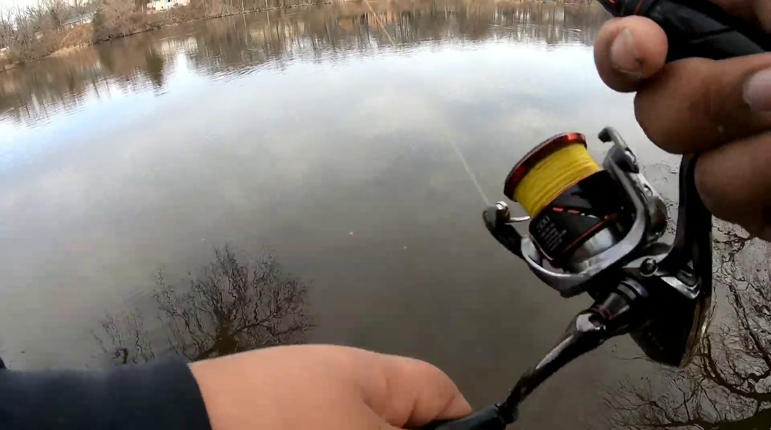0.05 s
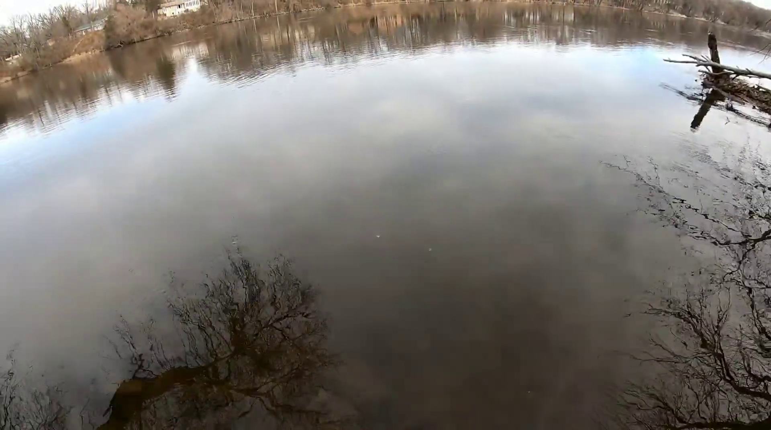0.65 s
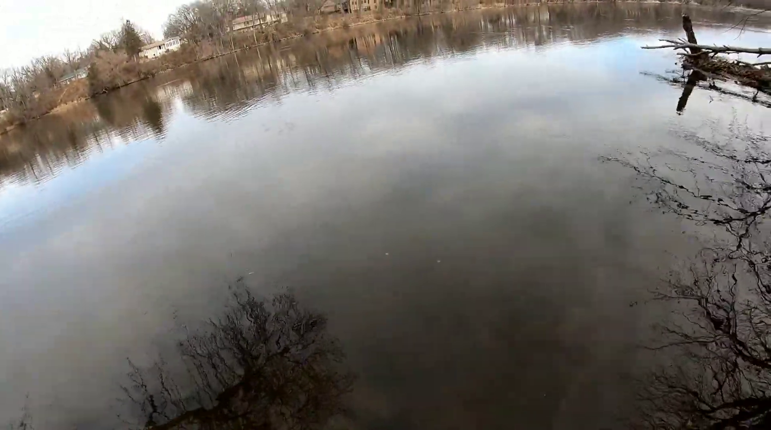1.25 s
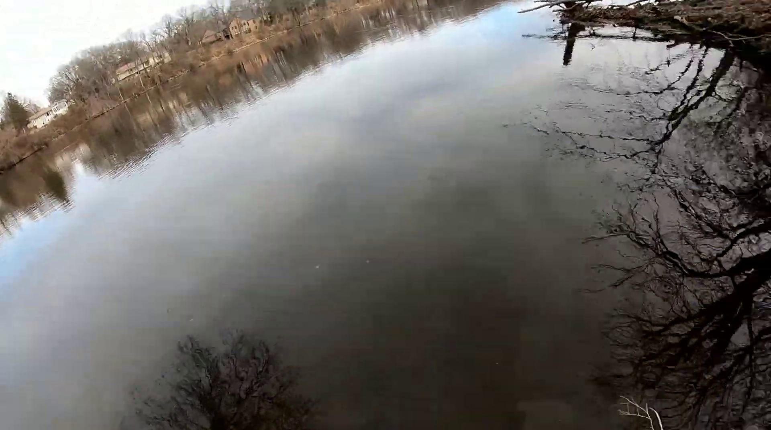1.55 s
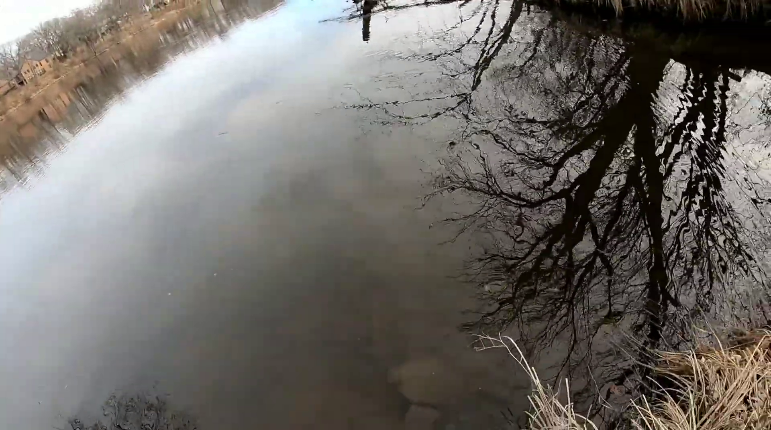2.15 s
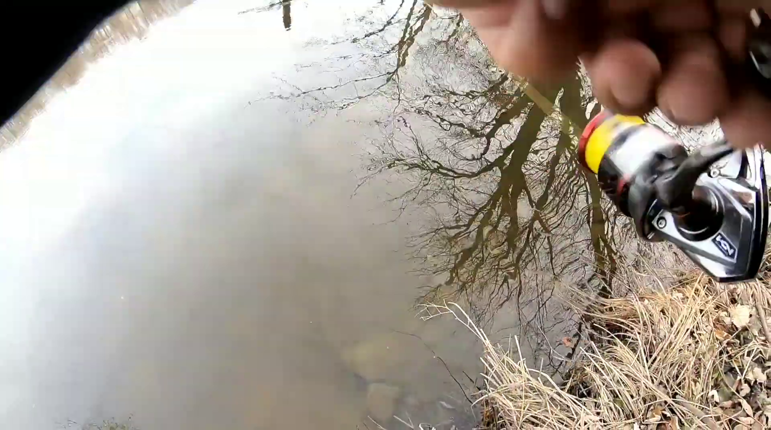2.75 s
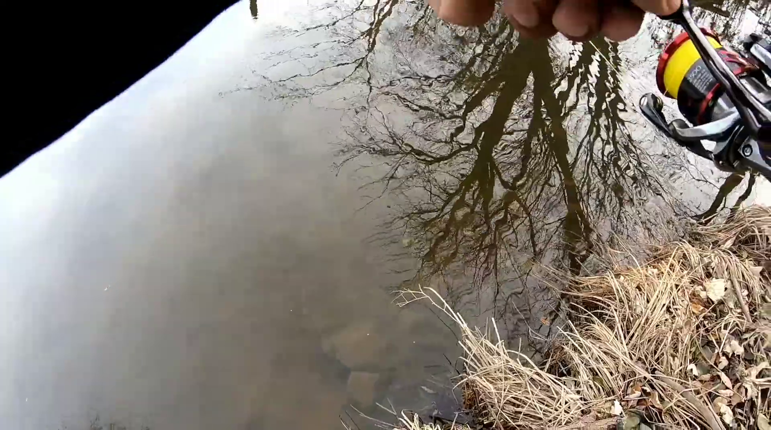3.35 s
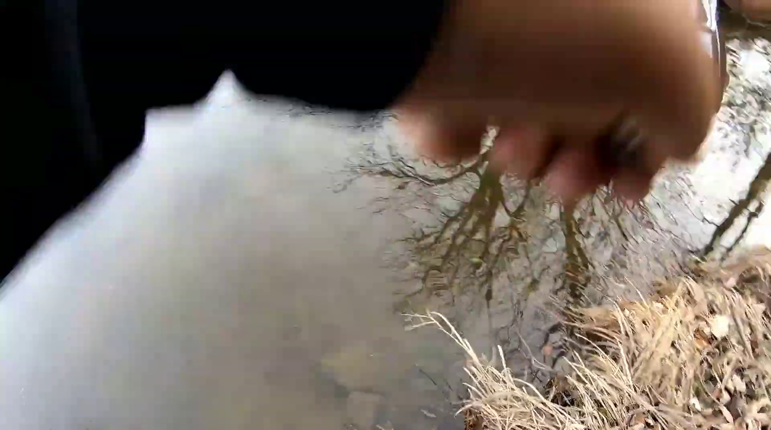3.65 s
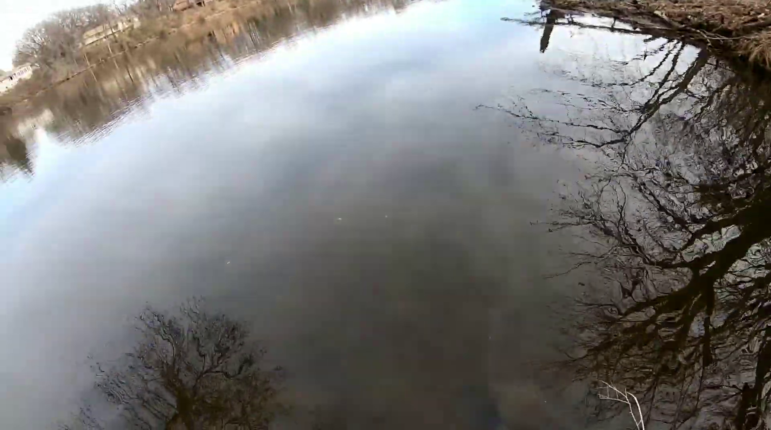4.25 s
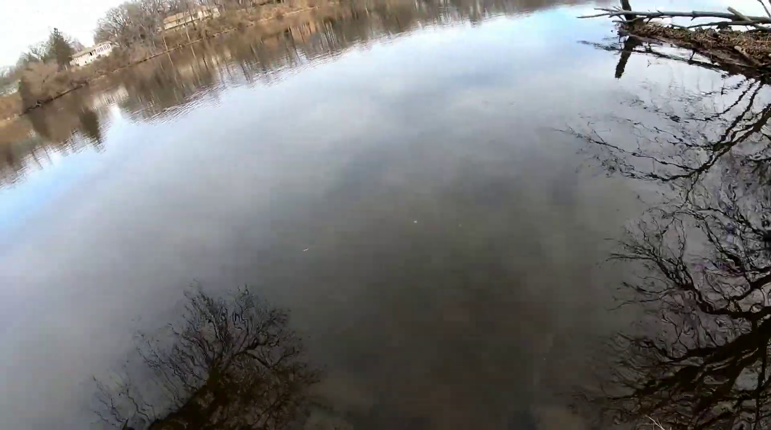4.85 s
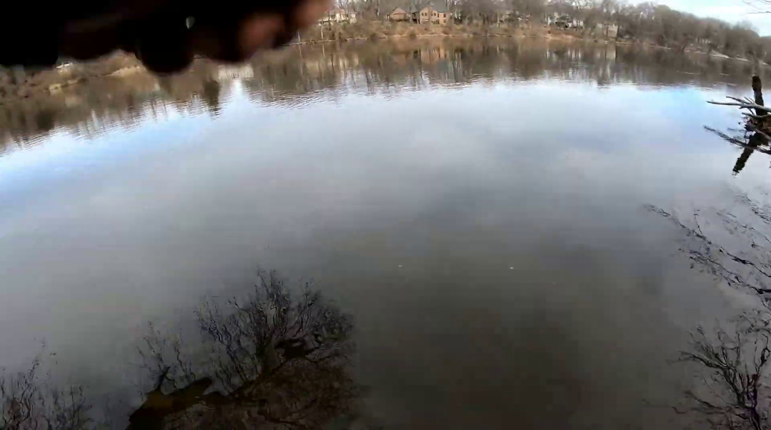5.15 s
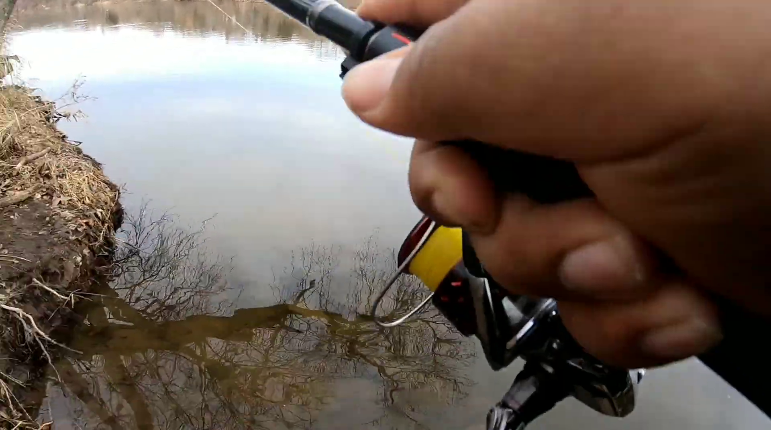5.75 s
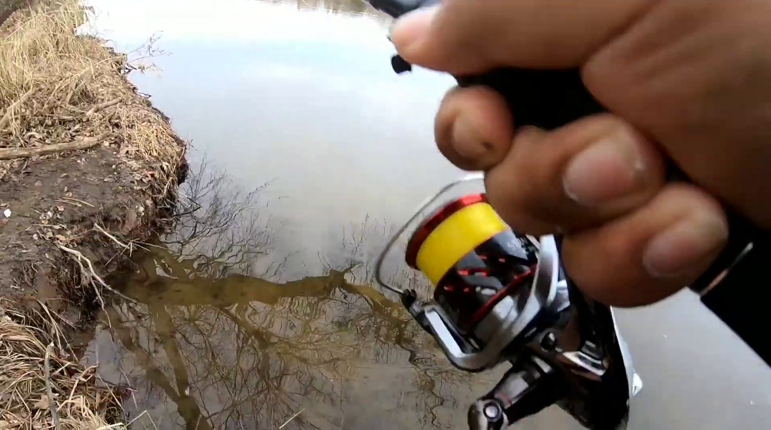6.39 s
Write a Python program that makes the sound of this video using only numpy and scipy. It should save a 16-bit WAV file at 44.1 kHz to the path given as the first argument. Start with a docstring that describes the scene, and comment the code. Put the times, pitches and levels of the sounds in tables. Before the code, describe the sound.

Faint ratchet ticks and a soft bump come first, over a low outdoor wind rumble. Then a fishing reel is wound in five uneven bursts with short pauses, very close to the microphone. The line runs over the rod guides with a bright, gritty hiss and a whistle that rises and falls with the hand, squeaking most in the last burst. Occasional reel clicks, sleeve rustles and dull knocks accompany the winding.

```python
"""On a riverbank, close to a body-worn camera, a spinning reel is cranked in five short spurts.
Braided line runs over the rod guides. Its weave is a periodic excitation, so it whistles at a pitch
that follows the uneven hand; its fibres rasp by friction, and the rod's resonances colour both.
The reel ticks between spurts, arms and sleeves bump and brush the camera, and wind rumbles on the
two microphone ports."""
import sys
import numpy as np
from scipy import signal
from scipy.fft import rfft, irfft
from scipy.io import wavfile
from scipy.ndimage import uniform_filter1d

SR = 44100
rng = np.random.default_rng(int(sys.argv[2]) if len(sys.argv) > 2 else 0)


def bounce(signal):
    """Save signal as a 16-bit WAV file at the path given by the first command-line argument."""
    frames = np.transpose(np.atleast_2d(signal))
    limited = np.clip(frames, -1, 1)
    pcm = np.round(limited * 32767).astype(np.int16)
    wavfile.write(sys.argv[1], SR, pcm)


N = 291942
T = np.arange(N) / SR
BINS = np.fft.rfftfreq(N, 1 / SR) + 1e-3


def undb(db):
    """Decibels to amplitude ratio."""
    return 10 ** (np.asarray(db) / 20)

def unit(x):
    """Normalisation to rms 1."""
    return x / np.sqrt(np.mean(x ** 2))

def steady(x):
    """Division by the short-term rms holds the level; quick flutter remains."""
    return x / np.sqrt(uniform_filter1d(np.mean(np.square(x), axis=0), SR // 30) + 1e-12)

def curves(rows):
    """Linear interpolation of each column over time."""
    s, *columns = np.transpose(rows)
    return [np.interp(T, s, c) for c in columns]

def across(points):
    """Interpolation of a table over log frequency."""
    hz, value = np.transpose(points)
    return np.interp(np.log(BINS), np.log(hz), value)

def shape(x, response):
    """Filtering by multiplication of spectra."""
    return irfft(rfft(x) * response, N)

def walk(rate_hz):
    """Smooth random modulation of rms 1."""
    k = max(int(SR / rate_hz), 2)
    return unit(uniform_filter1d(np.repeat(rng.standard_normal(N // k + 1), k)[:N], k))

def pan(db):
    """Two gains for a left-minus-right level difference."""
    return undb(np.array([[db], [-db]]) / 2)

def pair(apart):
    """Partly coherent noise at the two ports; apart weights the unshared part."""
    return unit(rng.standard_normal(N) + apart * rng.standard_normal((2, N)))

def noise_band(rows, width_hz):
    """Quadrature modulation: a noise band follows a path of pitch and level."""
    hz, db = curves(rows)
    phase = 2 * np.pi * np.cumsum(hz) / SR
    a, b = shape(rng.standard_normal((2, N)), 1 / (1 + (2 * BINS / width_hz) ** 4))
    band = unit(a * np.sin(phase) + b * np.cos(phase))
    return band * undb(db) * (T >= rows[0][0]) * (T < rows[-1][0])


# wind spectrum: frequency_hz, gain_db
WIND_SPECTRUM = [(20, -7), (70, 1), (160, -7.5), (430, -26), (780, -27), (1300, -44), (7000, -54),
                 (9000, -62), (15000, -80)]
# strength of the breeze: time_s, level_db
BREEZE = [(.3, -43), (.8, -47.5), (1.4, -37.5), (2.3, -43.5), (4.3, -43.5), (5.2, -39.5)]
def wind(air_db=-43.5, buffet_db=2.5):
    """Turbulent pressure on the ports: a rumble follows the breeze under a faint, even hiss."""
    air = unit(shape(pair(apart=0.47), undb(across(WIND_SPECTRUM))))
    rumble = shape(air, 1 / (1 + (BINS / 300) ** 4))
    gusts = undb(curves(BREEZE)[0] + buffet_db * walk(22))
    return ((air - rumble) * undb(air_db) + rumble * gusts) * pan(db=-1.5)


# ring of the spool: time_s, pitch_hz, level_db
SPOOL_RING = [(0, 2520, -64), (.26, 2560, -56), (.29, 3320, -60), (.72, 3290, -78)]
def spool():
    """Diffuse resonance: the spool rings faintly as the handle is eased round and let go."""
    return noise_band(SPOOL_RING, width_hz=440)


# finger movements: middle_s, length_s, centre_hz, level_db
RUSTLES = [(0.12, 0.49, 1720, -59.5), (0.273, 0.27, 4800, -59.5), (4.737, 0.098, 5880, -67),
           (5.65, 0.12, 2280, -66.5)]
def fingers(bandwidth=0.38):
    """Sliding friction: fingers shift on the grip in soft swells of broad noise."""
    out = 0
    for middle_s, length_s, hz, db in RUSTLES:
        band = 1 / (1 + ((BINS / hz - hz / BINS) / bandwidth) ** 2)
        swell = np.exp(-(2 * (T - middle_s) / length_s) ** 2)
        out += unit(shape(pair(apart=1.0), band)) * undb(db) * swell
    return out


# spectrum of a click: frequency_hz, gain_db
TICK_SPECTRUM = [(1700, -19), (2550, 5.5), (6800, 6), (9000, -19.5), (15000, -45.5)]
# single clicks of reel and line: start_s, level_db
TICKS = [(0.143, -44.5), (0.21, -41), (0.2245, -38.5), (0.239, -38.5), (0.2493, -36), (0.324, -35),
         (1.025, -32.5), (1.093, -25.5), (1.298, -23), (1.4667, -22.5), (2.1905, -47.5), (2.2588, -36),
         (3.852, -22.5), (5.3811, -30.5), (5.42, -41)]
def ticks(gain_db=-1, decay_s=0.0024, ratchet_s=(.015, .18), ratchet_hz=56, ratchet_db=-49):
    """Impacts of small metal parts: a faint, uneven run of the ratchet, then single catches."""
    teeth = np.arange(*ratchet_s, 1 / ratchet_hz)
    jitter = rng.standard_normal((len(teeth), 2))
    ratchet = [(s + .0015 * late, ratchet_db + 2 * loud) for s, (late, loud) in zip(teeth, jitter)]
    bursts = sum(undb(db) * np.exp(-np.abs(T - s) / decay_s) * (T >= s) for s, db in ratchet + TICKS)
    rounded = uniform_filter1d(bursts, SR // 1000)
    return undb(gain_db) * shape(pair(apart=0.94) * rounded, unit(undb(across(TICK_SPECTRUM))))


# spectrum of rubbing cloth: frequency_hz, gain_db
CLOTH_SPECTRUM = [(50, -7.5), (150, 7.5), (550, -12.5), (7000, -34), (10000, -57.5)]
# brushes of a sleeve: peak_s, level_db, fade_s
BRUSHES = [(.35, -39, 0.34), (1.38, -47, 0.35), (1.7, -42.5, 0.1), (2.38, -41.5, 0.92), (3.499, -47, 1.5),
           (5.258, -41, 0.5), (6.32, -38, 0.23)]
def sleeves(rise_s=0.34):
    """Friction of sleeve on jacket: each brush gains 20 dB in rise_s and loses 20 dB in fade_s."""
    drag = undb(2 * walk(35))
    rub = unit(shape(pair(apart=0.98) * drag, undb(across(CLOTH_SPECTRUM))))
    swells = sum(undb(db - 20 * np.maximum((s - T) / rise_s, (T - s) / fade_s))
                 for s, db, fade_s in BRUSHES)
    return rub * swells * pan(db=-2.0)


# modes of the camera mount: frequency_hz, t60_s, level_db
MOUNT_MODES = [(408, 0.018, 7.5), (308, 0.037, 4.5), (159.6, 0.07, 0), (98.2, 0.069, -6)]
# knocks on the mount: start_s, level_db, left_minus_right_db
BUMPS = [(0.254, -24.5, -14.5), (1.329, -30, -6.5), (1.368, -26.5, -5), (1.574, -33.5, -14.5),
         (2.538, -27.5, 3.5), (3.422, -19.5, -5), (3.693, -34.5, -19.5), (3.979, -26.5, -11),
         (5.251, -29.5, -18), (6.119, -28, -9)]
def bumps(scatter=0.13, gain_db=-1, lag_cycles=0.59, attack_s=0.0027):
    """Damped free vibration: soft knocks ring the mount, whose low modes come late and linger."""
    out = np.zeros((2, N))
    age = np.arange(SR // 5) / SR
    detunings = 1 + scatter * rng.standard_normal((len(BUMPS), len(MOUNT_MODES)))
    for (s, db, pan_db), detuning in zip(BUMPS, detunings):
        ring = 0
        for (hz, t60, mode_db), ratio in zip(MOUNT_MODES, detuning):
            t = np.maximum(age - lag_cycles / hz, 0)
            envelope = undb(mode_db - 60 * t / t60) * (1 - np.exp(-t / attack_s)) ** 2
            ring += envelope * np.sin(2 * np.pi * hz * ratio * t)
        knock = undb(db + gain_db) * pan(pan_db) * ring / np.abs(ring).max()
        start = int(s * SR)
        out[:, start:start + len(age)] += knock[:, :N - start]
    return out


# rate at which the weave passes a guide, one list per spurt: time_s, weave_hz
WEAVE_RATES = [
    [(1.02, 1150), (1.072, 1541), (1.09, 2199), (1.19, 1711), (1.25, 1927), (1.305, 1737), (1.373, 2560),
     (1.44, 1688), (1.505, 1696), (1.573, 1193), (1.62, 1613), (1.711, 783.3), (1.8, 385.1)],
    [(2.26, 419), (2.335, 877), (2.405, 1559), (2.455, 1643), (2.496, 997.7), (2.575, 1525), (2.635, 1160),
     (2.705, 1000), (2.746, 1051), (2.772, 802.3), (2.8, 750), (2.856, 1206), (2.895, 898), (2.925, 809),
     (2.97, 621)],
    [(3.43, 381), (3.525, 1866), (3.56, 1239), (3.605, 973), (3.685, 1772), (3.77, 949), (3.842, 1296),
     (3.868, 1714), (3.92, 1691), (3.955, 1330), (4.04, 1614), (4.15, 1119), (4.23, 1389), (4.263, 1893),
     (4.33, 1087), (4.38, 1044), (4.47, 375.6)],
    [(4.815, 447.4), (4.86, 702), (4.93, 1593), (4.962, 1477), (5.07, 1770), (5.135, 1514), (5.228, 1713),
     (5.256, 1468), (5.284, 1430), (5.318, 957.7), (5.365, 837.5), (5.43, 375.6)],
    [(5.93, 396), (5.985, 754.7), (6.045, 1682), (6.086, 1422), (6.125, 903), (6.165, 873.5), (6.203, 1290),
     (6.248, 1173), (6.285, 1532), (6.318, 876.5), (6.376, 543), (6.411, 331.4)],
]
def weave_rate(inertia_s=0.013):
    """Rotor inertia smooths the surge in line speed from each push on the handle."""
    hz, = curves([point for spurt in WEAVE_RATES for point in spurt])
    return uniform_filter1d(hz, int(inertia_s * SR))


# spurts of cranking: start_s, swell_s, rasp_db, whistle_db, hiss_over_rasp_db, growl_db
SPURTS = [(1.017, 0.058, -36, -3, 1, -46.5), (2.259, 0.07, -34.5, -2.5, 1, -51),
          (3.425, 0.071, -35.5, -1, 0.5, -50), (4.815, 0.043, -35.5, -2.5, 1, -43.5),
          (5.93, 0.06, -34.5, 0, -7.5, -36.5)]
# the hand's halt after each spurt: stop_s
STOPS = [1.762, 2.946, 4.432, 5.39, 6.37]
def spurt_gains(swell_db=27, release_t60_s=0.09):
    """Envelopes of rasp, whistle, hiss and growl: exponential growth, hold and decay."""
    gains = np.zeros((4, N))
    for (start_s, swell_s, rasp_db, whistle_db, hiss_db, growl_db), stop_s in zip(SPURTS, STOPS):
        swell = undb(swell_db * np.minimum((T - start_s) / swell_s - 1, 0))
        release = undb(-60 * np.maximum(T - stop_s, 0) / release_t60_s)
        gains += undb([[rasp_db], [whistle_db], [rasp_db + hiss_db], [growl_db]]) * swell * release
    return gains

def resonances(modes):
    """Superposition of second-order resonators."""
    return sum(undb(db) / (1 + 1j * (BINS / hz - hz / BINS) * hz / width) for hz, width, db in modes)

def ripple(depth_db):
    """Dense small resonances of the guides: a gliding partial flares and dips as it crosses them."""
    return undb(depth_db * np.tanh(walk(80)[:len(BINS)]))

def partial(phase, flutter_db=5):
    """Intermittent contact modulates one partial in amplitude and phase."""
    return unit(undb(flutter_db * np.tanh(walk(150))) * np.sin(phase + .6 * walk(300)))


# modes of rod and spool: frequency_hz, width_hz, gain_db
ROD_MODES = [(1300, 33, -3.5), (1471, 32, -7), (1770, 18, 1), (2081, 25, 5), (2400, 19, 2), (2560, 43, 8),
             (2727, 55, 9), (2987, 44, 5.5), (3130, 31, 6.5), (3463, 29, 1.5)]
# response between the modes: frequency_hz, gain_db
ROD_FLOOR = [(500, -44.5), (1000, -27.5), (2600, 4), (3600, -26.5), (4300, -12.5), (7000, -29.5)]
def rod_response():
    """Modal response: narrow resonances stand on a broad, band-limited floor."""
    band = 1 / np.sqrt((1 + (BINS / 7900) ** 30) * (1 + (750 / BINS) ** 10))
    return (resonances(ROD_MODES) + undb(across(ROD_FLOOR))) * band


# modes of the guides: frequency_hz, width_hz, gain_db
GUIDE_MODES = [(4030, 400, 3), (5120, 75, 3), (5330, 120, -7), (6150, 480, -4)]
def guide_response(spectrum, ripple_db):
    """Resonance of the metal guides colours a treble spectrum."""
    return undb(across(spectrum)) * (1 + resonances(GUIDE_MODES)) * ripple(ripple_db)


# whistle strength before the rod's resonances: pitch_hz, gain_db
WHISTLE_SPECTRUM = [(1200, -38.5), (1900, -35.5), (2550, -38.5), (3400, -38), (5000, -29.5)]
def whistle(phase, rod, twin_gain=0.55, twin_spread_hz=170, fray=0.44):
    """Forced vibration of the rod at the weave's octave; two guides sing apart and beat."""
    drift = 2 * np.pi * np.cumsum(twin_spread_hz * walk(70)) / SR
    tones = partial(2 * phase, flutter_db=3.0) + twin_gain * partial(2 * phase + drift, flutter_db=7.5)
    slipping_fibres = (1 + fray * walk(700)) * undb(5 * np.tanh(walk(220)))
    rough = steady([tones * slipping_fibres])[0]
    return shape(rough, rod * undb(across(WHISTLE_SPECTRUM)) * ripple(depth_db=3))


# strength of the weave's upper harmonics: pitch_hz, gain_db
OVERTONE_SPECTRUM = [(1500, -30), (3100, -16.5), (4400, -22), (6200, -12.5), (7400, -18.5), (9000, -45)]
def overtones(phase, rod, rod_db=-16):
    """Third and fourth harmonics excite the rod when the line is slow, the guides when it is fast."""
    third = .35 * partial(3 * phase + walk(600), flutter_db=9)
    fourth = partial(4 * phase + .8 * walk(600), flutter_db=10)
    return shape(third + fourth, rod * undb(rod_db) + guide_response(OVERTONE_SPECTRUM, ripple_db=6))


# strength of the weave's fundamental: pitch_hz, gain_db
GROWL_SPECTRUM = [(450, -19), (700, -2), (1700, 1.5), (2250, -3), (5000, -53)]
def growl(phase, sliding, friction, rod):
    """Forced vibration of the rod by the weave's fundamental and by friction noise."""
    force = partial(phase, flutter_db=8) * sliding + .7 * friction
    return shape(force, undb(across(GROWL_SPECTRUM)) * (1 + rod) * ripple(depth_db=3))

def grit(per_s=110, scatter_db=4, decay_s=0.0011):
    """Coarse snags arrive as a Poisson process, each a very short burst of noise."""
    snags = (rng.random(N) < per_s / SR) * undb(scatter_db * rng.uniform(-0.46, 1, N))
    return unit(pair(apart=0.83) * signal.lfilter([1], [1, -np.exp(-1 / (decay_s * SR))], snags))

def speckle(x, width_hz=350, depth_db=3.5, bands=15):
    """Independent modulation of narrow bands, as fibres of different lengths catch in turn."""
    band_index = np.clip((BINS - 3000) / width_hz, 0, bands - 1)
    return sum(shape(x, np.maximum(1 - np.abs(band_index - k), 0)) * undb(depth_db * walk(110))
               for k in range(bands))


# treble plateau of the sliding line: frequency_hz, gain_db
HISS_SPECTRUM = [(2300, -20.5), (3700, -2.5), (7700, 2.5), (8400, -21.5), (9500, -26), (15500, -44)]
def hiss(fine_friction, speed, grit_db=-2, speed_power=0.71):
    """Friction noise of fine fibres on the guides: a slower line is quieter and duller."""
    force = fine_friction + undb(grit_db) * grit()
    bright = steady(speckle(shape(force, guide_response(HISS_SPECTRUM, ripple_db=2.5))))
    dull = shape(bright, 1 / (1 + (BINS / 6000) ** 8))
    return (dull + (bright - dull) * np.minimum(speed, 1)) * speed ** speed_power

def fibre_friction(phase, weave_hz, comb_gain=0.45, grain_db=6.5, snag_db=-1.5):
    """Stick-slip of fibres over a comb of weave partials; returns coarse and fine friction."""
    # the strand pattern recurs every four repeats: quarter harmonics, with whole ones strongest
    comb = unit(sum((2 if k % 4 == 0 else 1) * partial(k / 4 * phase) * (k / 4 * weave_hz < SR / 5)
                    for k in range(3, 29)))
    catch = unit(undb(10 * np.tanh((grain_db * walk(2200) + snag_db * walk(120)) / 10)))
    return pair(apart=.8) * catch + comb_gain * comb, pair(apart=1.4) * catch + comb_gain / 2 * comb


# bites of the line on a guide: middle_s, length_s, level_db
SQUEALS = [(1.069, 0.0054, -27.5), (1.374, 0.0083, -28.5), (1.535, 0.019, -24.5), (1.587, 0.0088, -24.5),
           (1.643, 0.043, -28), (2.437, 0.04, -24.5), (2.781, 0.022, -35.5), (2.929, 0.015, -34.5),
           (3.502, 0.016, -28.5), (3.556, 0.035, -26.5), (3.645, 0.012, -23.5), (3.833, 0.016, -19),
           (4.032, 0.033, -22.5), (4.185, .022, -26), (4.222, 0.02, -21.5), (4.294, 0.019, -25.5),
           (4.959, 0.041, -25.5), (5.269, 0.031, -21), (6.02, 0.0093, -22.5), (6.101, 0.022, -20.5),
           (6.208, 0.022, -16), (6.243, 0.032, -18)]
def squeals(phase, weave_hz, resonance_hz=2800):
    """Lock-in: a bite favours harmonics near the rod's main resonance. Returns grip 0-1 and sound."""
    grips = [np.exp(-(2 * (T - s) / length_s) ** 6) for s, length_s, _ in SQUEALS]
    envelope = sum(undb(db) * grip for grip, (_, _, db) in zip(grips, SQUEALS))
    tone = sum(np.sin(k * phase) / (1 + (2 * np.log2(k * weave_hz / resonance_hz)) ** 8)
               for k in (1, 2, 4))
    flutter = unit(undb(2.5 * np.tanh(walk(220)) + walk(600)))
    return np.minimum(sum(grips), 1), tone * flutter * envelope

def braid(cruise_hz=1530, stall_hz=635, rasp_db=-2.5, hiss_db=-2.0, chatter_db=1.0):
    """Sliding friction of a periodic surface: the line's pitch and loudness rise with its speed."""
    weave_hz = weave_rate()
    rasp_gain, whistle_gain, hiss_gain, growl_gain = spurt_gains()
    speed = weave_hz / cruise_hz
    sliding = 1 / np.hypot(1, (stall_hz / weave_hz) ** 1.6)  # a stalling line falls quiet
    rod = rod_response()
    unevenness = 1 + .011 * walk(400) + .008 * walk(90)  # of the weave, so its pitch wavers
    phase = 2 * np.pi * np.cumsum(weave_hz * unevenness) / SR
    bite, squeal = squeals(phase, weave_hz)
    song = whistle(phase, rod) * whistle_gain * (1 - bite) * sliding + squeal
    friction, fine_friction = fibre_friction(phase, weave_hz)
    rasp = rasp_gain * undb(rasp_db) * steady(shape(friction, rod))
    fibre_hiss = undb(hiss_db) * hiss(fine_friction, speed)
    body = rasp + growl_gain * growl(phase, sliding, friction, rod)
    treble = hiss_gain * (fibre_hiss + overtones(phase, rod))
    rubbing = (body * pan(db=-2.5) + treble * pan(db=-1.2)) * speed ** 0.16
    chatter = unit(undb(chatter_db * walk(110)))
    return song * pan(db=-2.1) + sliding * rubbing * chatter


# judder of the grip: time_s, slip_rate_hz, level_db
JUDDER = [(2.402, 115, -34.5), (2.44, 162, -35.5), (2.485, 154, -51)]
# spectrum of a slip before its low-pass: frequency_hz, gain_db
SLIP_SPECTRUM = [(80, -26), (160, 2.5), (320, 6), (1000, -28)]
def judder(cutoff_hz=1000):
    """Stick-slip oscillation of the grip: a brief train of dull, slightly uneven pulses."""
    hz, db = curves(JUDDER)
    cycles = np.cumsum(hz * (1 + walk(150) / 20)) / SR
    slips = np.diff(np.floor(cycles), prepend=0)
    dull = undb(across(SLIP_SPECTRUM)) / (1 + (BINS / cutoff_hz) ** 2)
    return unit(shape(slips, dull)) * undb(db) * (T > JUDDER[0][0]) * (T < JUDDER[-1][0])


# bright scrape of the line: time_s, pitch_hz, level_db
SCRAPE = [(2.5, 6410, -38), (2.525, 6150, -32.5), (2.67, 5800, -36), (2.85, 5400, -44)]
def scrape():
    """Narrow-band friction noise flutters and sinks in pitch during the second spurt."""
    return noise_band(SCRAPE, width_hz=1000) * unit(undb(3 * walk(70)))

def scene():
    """Superposition of wind, reel, handling and line."""
    return wind() + spool() + fingers() + ticks() + sleeves() + bumps() + braid() + judder() + scrape()


# phase lead of the left port over the right: frequency_hz, lead_rad
PORT_PHASE = [(260, 0.91), (520, -3.0), (1380, -4.5), (3200, -5.5)]
def record(dry):
    """A frequency-dependent phase difference separates the two ports; a low-pass cuts the top."""
    phase_shift = np.exp(.5j * across(PORT_PHASE) * np.array([[1], [-1]]))
    lowpass = signal.ellip(8, .2, 70, 15700, fs=SR, output="sos")
    return signal.sosfilt(lowpass, shape(dry, phase_shift))


dry = scene()
out = record(dry)
bounce(out)
```